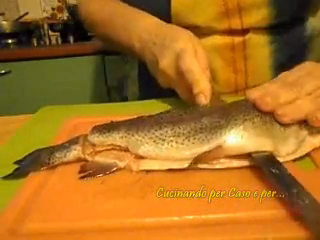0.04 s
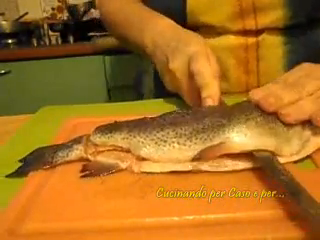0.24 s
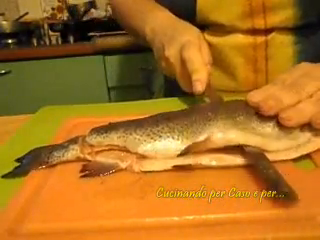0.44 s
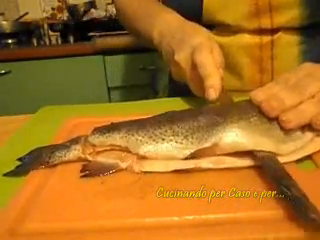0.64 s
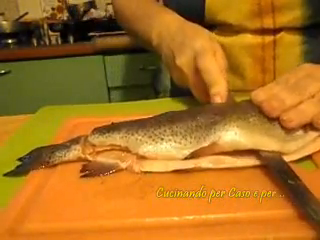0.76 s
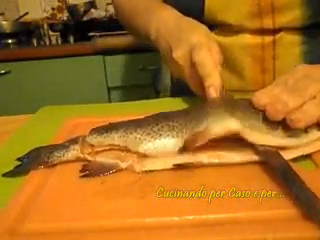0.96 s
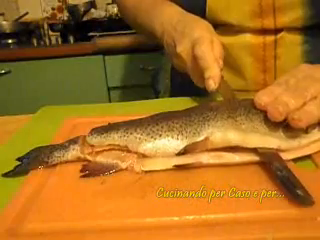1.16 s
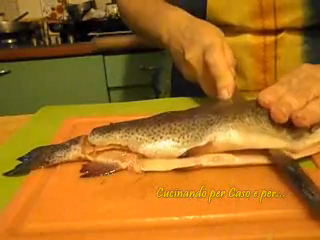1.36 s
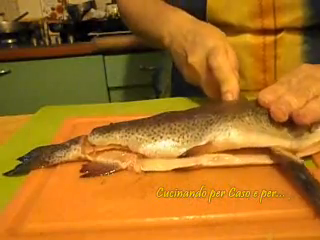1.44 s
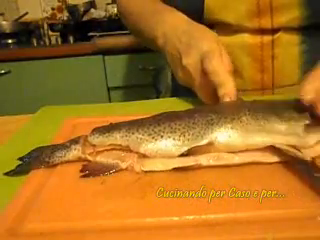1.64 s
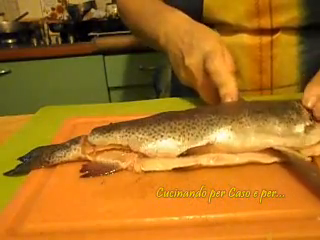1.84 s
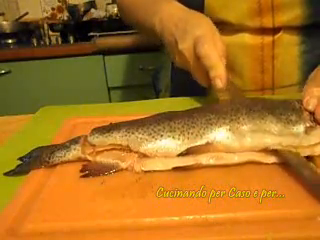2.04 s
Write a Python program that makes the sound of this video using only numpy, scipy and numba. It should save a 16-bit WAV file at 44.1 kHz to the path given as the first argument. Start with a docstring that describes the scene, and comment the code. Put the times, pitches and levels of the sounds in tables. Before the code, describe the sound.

A knife scrapes along a fish's backbone in short, uneven strokes, tearing wet flesh. Thin ribs snap sharply and the blade bumps dully against the spine. It sounds close, in a small kitchen with a faint appliance hum.

```python
"""A flexible knife works along the backbone of a fish on a plastic cutting board.
Each stroke tears wet flesh and rasps over bone, ringing the pocket under the fillet, blade and board.
The blade bumps the spine with dull thuds, and ribs snap in quick splinters.
An appliance hums in the small kitchen, whose walls and cupboards add a short tail."""
import sys
import numpy as np
from scipy import signal
from scipy.fft import rfft, irfft
from scipy.io import wavfile
from scipy.ndimage import uniform_filter1d, minimum_filter1d
from numba import njit

SR = 44100
rng = np.random.default_rng(int(sys.argv[2]) if len(sys.argv) > 2 else 0)


def unload_wav(signal):
    """Save mono or channel-first audio to the path in sys.argv[1] as 16-bit WAV at rate SR, clipped to [-1, 1]."""
    wavfile.write(
        sys.argv[1],
        SR,
        np.round(np.clip(np.atleast_2d(signal).T, -1, 1) * 32767).astype(np.int16),
    )


N = 92610
BLOW_S = 0.005  # energy window of one impact


def undb(db):
    """Decibels to gain."""
    return 10 ** (np.asarray(db) / 20)


def level(x, db, span_s):
    """Scale x so that its energy, spread over span_s, has this RMS level."""
    return x * undb(db) * np.sqrt(span_s * SR / (np.sum(x ** 2) + 1e-18))


def walk(rate_hz, size):
    """Smooth random curve, spread near 1."""
    position = np.arange(size) * rate_hz / SR
    return 1.2 * np.interp(position, np.arange(512), rng.standard_normal(512))


def colour(x, spectrum):
    """Minimum-phase filter through (freq_hz, gain_db) points."""
    freq_hz, gain_db = np.array(spectrum, float).T
    grid_hz = np.maximum(np.fft.rfftfreq(4096, 1 / SR), 1)
    gain = undb(np.interp(np.log(grid_hz), np.log(freq_hz), gain_db))
    cepstrum = irfft(np.log(gain))
    half = len(cepstrum) // 2
    cepstrum[1:half] *= 2
    cepstrum[half + 1:] = 0
    impulse = irfft(np.exp(rfft(cepstrum)))
    return signal.fftconvolve(x, impulse)[:len(x)]


def ring(x, modes):
    """Parallel resonances driven by x, each two band-passes in series."""
    out = 0
    for freq_hz, width_hz, gain_db in modes:
        b, a = signal.iirpeak(freq_hz, freq_hz / width_hz, fs=SR)
        out = out + undb(gain_db) * signal.lfilter(b, a, signal.lfilter(b, a, x))
    return out


@njit
def sweep(x, centre_hz, width_hz):
    """State-variable band-pass with a moving centre."""
    out, band_state, low_state = np.empty(len(x)), 0., 0.
    for i in range(len(x)):
        g = np.tan(np.pi * centre_hz[i] / SR)
        damping = width_hz / centre_hz[i]
        band = (band_state + g * (x[i] - low_state)) / (1 + g * (g + damping))
        band_state = 2 * band - band_state
        low_state += 2 * g * band
        out[i] = damping * band
    return out


def moving_ring(x, centre_hz, width_hz):
    """Steep-sided moving resonance: two sweeps in series."""
    return sweep(sweep(x, centre_hz, width_hz), centre_hz, width_hz)


def add(out, start_s, x):
    """Mix x into out at start_s."""
    i = max(int(start_s * SR), 0)
    out[i:i + len(x)] += x[:max(N - i, 0)]


# Room noise: freq_hz, gain_db
AIR_SPECTRUM = [(25, -49), (60, -12), (105, -8), (155, -14.5), (250, -5.5), (450, 0), (1100, 1.5),
                (2000, -2.5), (3000, -3), (5000, -5.5), (7500, -8.5), (9700, -23.5), (15500, -22)]


def kitchen(air_db=-34.5, flicker_db=1.95, hum_hz=103.6, hum_db=-59.5):
    """Softly flickering room noise and an appliance hum that wavers in pitch."""
    air = colour(rng.standard_normal(N), AIR_SPECTRUM)
    air *= undb(-flicker_db * walk(26.69, N))
    pitch_hz = hum_hz * (1 + 0.038 * walk(13, N))
    hum = np.sin(2 * np.pi * np.cumsum(pitch_hz) / SR)
    return level(air, air_db, N / SR) + level(hum, hum_db, N / SR)


def fibres(size, breaks_per_s=1900, spread_db=3, slide_gain=0.15):
    """Dense tiny fibre breaks of uneven size over a smooth slide."""
    breaks = (rng.random(size) < breaks_per_s / SR) * rng.choice([-1, 1], size)
    strength = undb(spread_db * np.clip(rng.standard_normal(size), -2, 2))
    return level(breaks * strength, 0, size / SR) + slide_gain * rng.standard_normal(size)


# Tearing flesh, cracking bone: freq_hz, gain_db
FLESH_SPECTRUM = [(60, -46.5), (200, -7.5), (480, 2), (950, 7), (1500, -11), (1820, 5), (2400, -3.5),
                  (3400, -4.5), (4200, -2), (6600, -2.5), (7800, -15.5), (9700, -16.5), (16000, -4.5)]
BONE_SPECTRUM = [(300, -63), (3200, -15.5), (4200, 2.5), (5300, 4.5), (6000, 3), (6800, -4.5),
                 (7500, -30.5), (9700, -22.5), (16000, -18.5)]
# Resonances of blade, board and bright grating: freq_hz, width_hz, gain_db
BLADE_MODES = [(4980, 79, 6.5), (5970, 76, 3.5), (6860, 190, -2.5), (9670, 220, -4.5)]
BOARD_MODES = [(109, 123, -10), (228, 71, 2), (340, 132, -6), (488, 227, -6)]
SIZZLE_MODES = [(8100, 600, 3.5), (8840, 600, 1), (9800, 180, -6), (12700, 4000, -10)]
# Knife pushes: start_s, length_s, rise_s, fall_s, tear_db, pocket_hz, pocket_db,
# rasp_db, blade_db, grating_hz, grating_db, board_db
KNIFE_STROKES = [ (0.005, 0.150, 0.1, 0.072, -34.5, 1090, -47, -36.5, -74, 2680, -44.5, -51),
                 (0.156, 0.094, 0.02, 0.016, -33.5, 1110, -35, -40, -43, 1770, -66, -52),
                 (0.234, 0.1, 0.0039, 0.024, -31, 1077, -31.5, -36.5, -38.5, 1780, -48, -45),
                 (0.43, 0.037, 0.0019, 0.064, -29, 1240, -41, -30, -55, 1840, -38, -49.5),
                 (0.469, 0.076, 0.018, 0.022, -33, 1190, -33.5, -29.5, -39.5, 2080, -36.5, -50),
                 (0.54, 0.052, 0.0056, 0.0066, -31, 1160, -35, -27, -35, 1980, -42, -45),
                 (0.59, 0.019, 0.0035, 0.1, -31.5, 1170, -51, -23.5, -59, 1870, -51, -53),
                 (0.728, 0.064, 0.0099, 0.081, -42, 1140, -30, -33, -38, 2900, -40, -48),
                 (0.81, 0.13, 0.015, 0.013, -29, 1120, -33, -54, -36.5, 1700, -37.5, -41.5),
                 (0.932, 0.064, 0.0066, 0.065, -30.5, 1220, -32.5, -56, -37, 1690, -53, -38),
                 (1.043, 0.15, 0.014, 0.0085, -39, 1270, -43, -35.5, -46, 2720, -45.5, -51),
                 (1.131, 0.033, 0.016, 0.0052, -28.5, 1320, -29, -28, -38, 2140, -26, -43),
                 (1.157, 0.06, 0.0066, 0.0099, -30.5, 1310, -26, -33, -30.5, 2760, -30.5, -56),
                 (1.21, 0.057, 0.013, 0.038, -26.5, 1316, -24.5, -26.5, -34, 2840, -27.5, -62),
                 (1.274, 0.041, 0.0015, 0.053, -31.5, 1300, -45, -27.5, -54, 3090, -30.5, -52.5),
                 (1.385, 0.1, 0.037, 0.072, -34, 1380, -36.5, -32.5, -39, 2730, -57, -43.5),
                 (1.498, 0.033, 0.0035, 0.021, -29, 1350, -32, -41, -28.5, 1680, -41, -42),
                 (1.53, 0.032, 0.0025, 0.0093, -25.5, 1275, -27, -30, -33, 1900, -34, -43),
                 (1.582, 0.044, 0.0058, 0.0085, -28, 1310, -31.5, -42, -45, 4030, -31.5, -39),
                 (1.619, 0.063, 0.0086, 0.038, -51, 1440, -36.5, -54, -37, 4160, -49, -42.5),
                 (1.732, 0.2, 0.14, 0.066, -39.5, 1270, -42.5, -43, -48, 3450, -45, -58),
                 (2.066, 0.075, 0.019, 0.0087, -54, 1120, -52, -36.5, -62, 4170, -59, -63)]


def knife_strokes(catch_hz=115, catch_db=2, glide_oct_per_s=0.63, wobble_hz=64, wobble_oct=0.022):
    """Each push swells, catches and fades; breaking fibres drive flesh, bone, blade and board."""
    out, size = np.zeros(N), SR // 4
    t = np.arange(size) / SR
    for (start_s, length_s, rise_s, fall_s, tear_db, pocket_hz, pocket_db,
         rasp_db, blade_db, grating_hz, grating_db, board_db) in KNIFE_STROKES:
        swell = np.clip(np.minimum(t / rise_s, (length_s - t) / fall_s), 0, 1) ** 0.33
        push = swell * undb(catch_db * walk(catch_hz, size))
        flesh, bone, body = (push * fibres(size) for _ in range(3))
        # Pocket and bone rise in pitch as the blade slides on.
        bend = 2 ** (glide_oct_per_s * (t - length_s / 2) + wobble_oct * walk(wobble_hz, size))
        parts = [(colour(flesh, FLESH_SPECTRUM), tear_db),
                 (moving_ring(body, pocket_hz * bend, width_hz=304), pocket_db),
                 (colour(bone, BONE_SPECTRUM), rasp_db),
                 (ring(body, BLADE_MODES), blade_db),
                 (moving_ring(bone, grating_hz * bend, width_hz=520), grating_db),
                 (ring(bone, SIZZLE_MODES), grating_db - 7),
                 (ring(flesh, BOARD_MODES), board_db)]
        add(out, start_s, sum(level(part, db, length_s) for part, db in parts))
    return out


# Thud in the flesh: freq_hz, gain_db
THUD_SPECTRUM = [(60, -30), (300, -13.5), (750, 0), (1300, -4.5), (2200, -24), (6000, -23)]
# Blade against spine: start_s, pocket_hz, pocket_db, thud_db, board_db
SPINE_BUMPS = [ (0.266, 1090, -34, -28, -40), (0.319, 1120, -30, -28.5, -37),
               (0.776, 1170, -23.5, -41, -46), (0.822, 980, -40, -26, -30), (0.8399, 1210, -24, -32, -41),
               (0.867, 1100, -39, -24, -38), (0.898, 1210, -27, -33, -51), (0.9064, 1700, -25, -32, -43),
               (0.936, 950, -39, -21.5, -32), (0.964, 1250, -27, -50, -45), (1.178, 1420, -22, -30, -42),
               (1.199, 1300, -26, -29, -51), (1.5001, 1130, -27, -23.5, -41),
               (1.5121, 1730, -19.5, -29.5, -33), (1.5392, 1310, -25, -34, -37),
               (1.5721, 1060, -28, -24.5, -27), (1.606, 1470, -22, -37, -45),
               (1.617, 1010, -41, -27.5, -34), (1.649, 1410, -30, -34, -38), (1.665, 1360, -34, -41, -39),
               (1.825, 1286, -26.5, -36, -56)]


def spine_bumps(contact_s=0.00016, pocket_width_hz=266):
    """The blade slips onto the next vertebra: one soft push into flesh, pocket and board."""
    out, t = np.zeros(N), np.arange(SR // 10) / SR
    force = np.exp(-t / contact_s)
    thud, board = colour(force, THUD_SPECTRUM), ring(force, BOARD_MODES)
    for start_s, pocket_hz, pocket_db, thud_db, board_db in SPINE_BUMPS:
        pop = ring(force, [(pocket_hz, pocket_width_hz, 0)])
        add(out, start_s, level(pop, pocket_db, BLOW_S))
        add(out, start_s, level(thud, thud_db, BLOW_S))
        add(out, start_s, level(board, board_db, 2 * BLOW_S))
    return out


# Splintering bone: freq_hz, gain_db
SPLINTER_SPECTRUM = [(100, -11.5), (500, -13), (1900, 9), (2400, -7.5), (3000, 7.5), (4000, 6),
                     (6800, -3.5), (8300, -2.5), (10000, -26.5), (16000, -10.5)]
# Blade damped against bone: freq_hz, width_hz, gain_db
TICK_MODES = [(5104, 380, 0), (5836, 350, 0)]
# Pocket under the fillet: pitch_ratio, width_hz, gain_db
POP_MODES = [(.45, 455, -7.5), (1, 340, 5.5), (1.68, 500, -9.5)]
# Breaking ribs: start_s, length_s, crack_db, splinter_db, pocket_db
RIB_SNAPS = [ (0.433, 0.0037, -16.5, -22, -29.5), (0.551, 0.0091, -21, -24, -36),
             (0.5893, 0.004, -9, -20, -17.5), (0.7285, 0.0028, -14.5, -25.5, -27.5),
             (0.759, 0.0024, -24, -41, -29), (0.839, 0.0021, -19.5, -35, -23.5),
             (0.877, 0.0051, -20.5, -24.5, -21.5), (0.9, 0.0018, -31, -24.5, -32),
             (0.9875, 0.0021, -22.5, -40, -34), (1.044, 0.0015, -26, -39, -48),
             (1.1242, 0.0035, -23, -27, -37), (1.2735, 0.0033, -8, -12, -22),
             (1.346, 0.0018, -25, -57, -34), (1.405, 0.0068, -33, -24, -27),
             (1.4242, 0.0026, -20.5, -21, -21), (1.5122, 0.0017, -22.5, -19.5, -40),
             (1.595, 0.0025, -21.5, -20, -36), (1.612, 0.00076, -19, -22.5, -42),
             (1.674, 0.0013, -27.5, -48, -46), (1.7696, 0.0015, -17.5, -34, -47)]


def rib_snaps(mean_gap_s=0.0008, peak_share=0.43, rib_width_hz=390):
    """A rib gives way in quick splinters: a bright crack that rings bone, blade and pocket."""
    out, size = np.zeros(N), SR // 20
    for start_s, length_s, crack_db, splinter_db, pocket_db in RIB_SNAPS:
        gap, strength, side = rng.random((3, 16))
        times_s = mean_gap_s * (np.cumsum(gap + 0.5) - gap[0] - 0.5)
        envelope = (times_s < 2 * length_s) * undb(-18 * (times_s / length_s - peak_share) ** 2)
        kicks = envelope * (1 + strength) * np.sign(side - 0.5)
        force = np.bincount((times_s * SR).astype(int), kicks, size)[:size]
        # The latest stroke sets the pitches.
        stroke = [row for row in KNIFE_STROKES if row[0] < start_s + BLOW_S][-1]
        pocket_hz, rib_hz = stroke[5], stroke[9]
        pocket_modes = [(pocket_hz * ratio, width_hz, db) for ratio, width_hz, db in POP_MODES]
        parts = [(colour(force, BONE_SPECTRUM), crack_db),
                 (colour(force, SPLINTER_SPECTRUM), splinter_db),
                 (ring(force, [(rib_hz, rib_width_hz, 0)]), splinter_db - 6),
                 (ring(force, TICK_MODES), crack_db - 9),
                 (ring(force, pocket_modes), pocket_db)]
        add(out, start_s, sum(level(part, db, BLOW_S) for part, db in parts))
    return out


def room(x, t60_s=0.32, tail_db=-9.5, delay_s=0.0047, low_cut_hz=326):
    """Cupboards and walls add a short diffuse tail with little bass."""
    t = np.arange(SR // 2) / SR
    decay = np.exp(-np.log(1000) * t / t60_s) * (t > delay_s)
    low_cut = signal.butter(2, low_cut_hz, "high", fs=SR, output="sos")
    tail = signal.sosfilt(low_cut, decay * rng.standard_normal(len(t)))
    return x + signal.fftconvolve(x, level(tail, tail_db, 1 / SR))[:N]


def limiter(x, limit=1.06):
    """Gain dips for about a millisecond around any peak over the limit."""
    gain = np.minimum(1, limit / (np.abs(x) + 1e-9))
    return x * uniform_filter1d(minimum_filter1d(gain, size=31), size=31)


def scene():
    """Knife work in the room over the kitchen background, mono."""
    knife = knife_strokes() + rib_snaps() + spine_bumps()
    return (room(knife) + kitchen())[None]


def record(dry, low_cut_hz=53, treble_edge_hz=10050, leak_db=-21.5, hiss_db=-56, top_hz=15650):
    """Thin the bass, dull the top octave, limit and clip the cracks, add hiss, cut the top."""
    x = signal.sosfilt(signal.butter(2, low_cut_hz, "high", fs=SR, output="sos"), dry)
    dulled = signal.sosfilt(signal.ellip(8, 0.2, 60, treble_edge_hz, fs=SR, output="sos"), x)
    x = dulled + undb(leak_db) * x
    x = np.clip(limiter(x), -0.9, 0.9)
    x += undb(hiss_db) * rng.standard_normal(N)
    return signal.sosfilt(signal.ellip(8, 0.2, 70, top_hz, fs=SR, output="sos"), x)


dry = scene()
out = record(dry)
unload_wav(out)
```